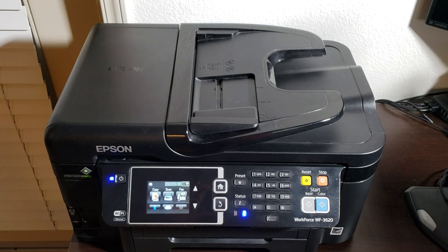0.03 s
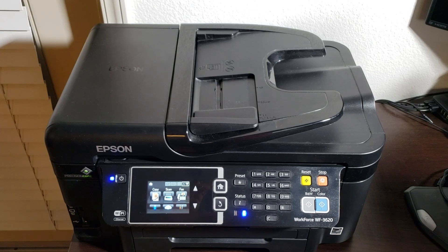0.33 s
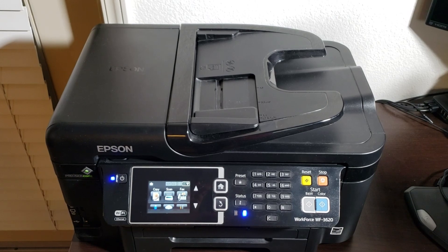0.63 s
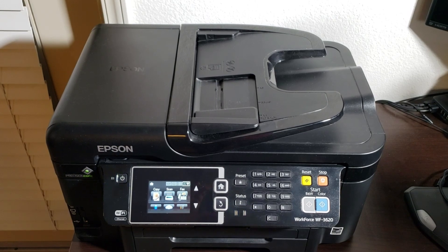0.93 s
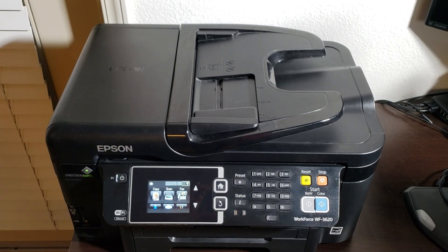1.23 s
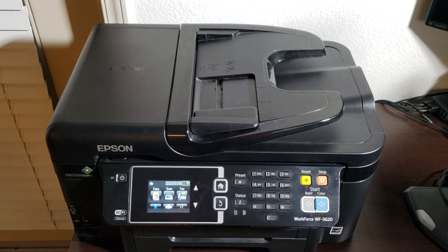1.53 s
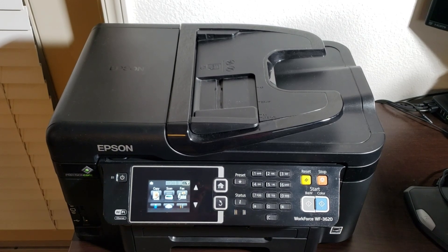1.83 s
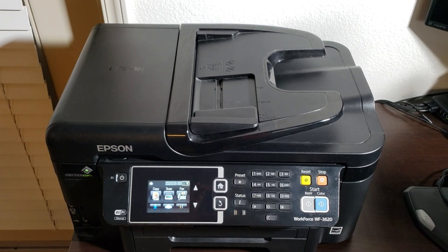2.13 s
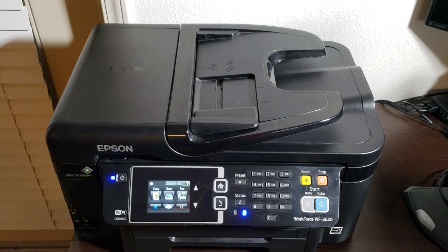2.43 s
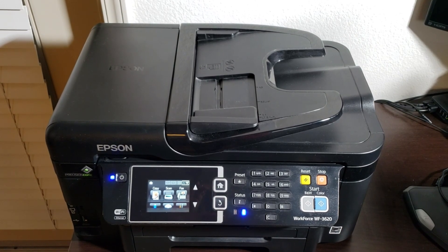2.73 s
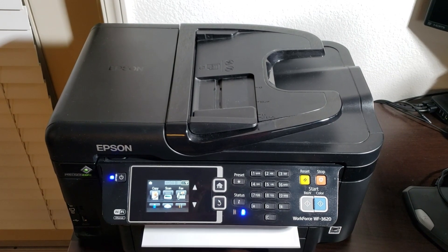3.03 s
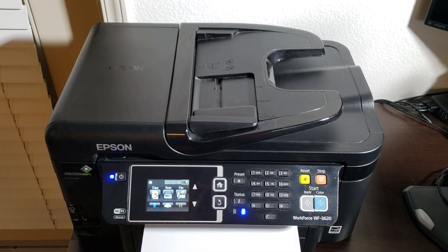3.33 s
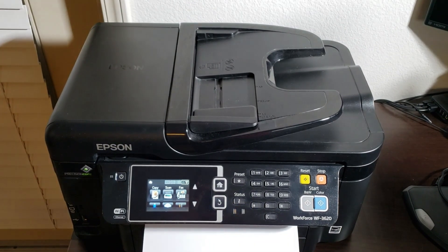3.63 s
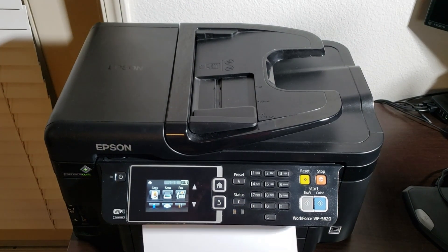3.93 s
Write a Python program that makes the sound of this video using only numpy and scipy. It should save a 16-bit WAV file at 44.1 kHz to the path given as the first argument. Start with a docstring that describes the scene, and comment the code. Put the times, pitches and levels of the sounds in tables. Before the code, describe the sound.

Three rattling printer clunks, followed by a whirring feed motor and the hiss of sliding paper.

```python
"""On a desk in a small quiet room, an inkjet printer works close by, over a low hum.
Three times its carriage rumbles, clashes against a latch and knocks into its stop, ringing the frame.
Its drive clacks in the hollow plastic housing as it starts and stops.
Then the geared feed motor whirs in two runs and slides a sheet out. The paper hisses,
jerks the gears with a few knocks and squeals faintly on the rollers."""
import sys
import numpy as np
from scipy import signal
from scipy.fft import rfft, irfft
from scipy.io import wavfile

SR = 44100
rng = np.random.default_rng(int(sys.argv[2]) if len(sys.argv) > 2 else 0)


def log_audio(samples):
    """Write samples as a 16-bit WAV file to the path given in sys.argv[1]."""
    # one column per channel
    frames = np.atleast_2d(samples).T
    # limit to full scale, then quantise
    limited = np.clip(frames, -1, 1)
    pcm = np.round(limited * 32767).astype(np.int16)
    wavfile.write(sys.argv[1], SR, pcm)


N = 176400
T = np.arange(N) / SR  # time of each sample, in seconds
FREQ = np.arange(4097) * SR / 8192  # frequencies the filters work on, in Hz

# how long the room takes to die away by 60 dB (f/Hz, t/s)
ROOM_DECAY = [(100, 0.63), (7000, 0.53), (10000, 0.42), (16000, 0.49)]
# what differs between the ears, against what they share (f/Hz, level/dB)
STEREO_WIDTH = [(150, -21.5), (400, -9.5), (1300, 1.5), (4000, 0)]
# how much louder the left ear is than the right (f/Hz, level/dB)
LEFT_LEAD = [(60, 3), (1300, 2.5), (2400, -0.5), (4400, 9.5), (8000, 6), (12000, 1.5)]
# tones of the resting printer and of the powered motor (f/Hz, level/dB)
IDLE_TONES = [(59.2, -72.5), (120, -68), (266, -73)]
MOTOR_TONES = [(59.2, -67), (119, -63)]
# tone colours: how strong the lows and highs of a sound are against each other (f/Hz, level/dB)
AIR_COLOUR = [(25, -18.5), (60, -5.5), (250, -3.5), (450, -1.5), (600, -10.5), (1200, -19.5), (1480, -10),
              (1850, -28), (9000, -41.5), (14000, -30.5)]
PAPER_COLOUR = [(800, 6), (4500, -1.5), (7000, -7), (11500, -3), (16000, -8)]
GEAR_COLOUR = [(50, -37), (130, -14), (220, 7), (310, -1), (410, -1.5), (490, 4.5), (720, 2), (1050, 1.5),
               (1450, -3), (1900, -2), (2500, -7.5), (5000, -16.5), (8000, -23), (16000, -47)]
RUMBLE_COLOUR = [(30, -34.5), (90, -13.5), (165, -7), (215, 5), (370, -14), (1000, -10), (5000, -27.5),
                 (16000, -49.5)]
LATCH_COLOUR = [(200, -46.5), (900, 7), (2300, -1), (3350, 10), (5200, -3.5), (6700, 3), (9500, -5.5),
                (12000, 0), (16000, -12.5)]
CRACK_COLOUR = [(500, -20), (1500, 4.5), (4000, -1), (10000, -10.5)]
CLACK_COLOUR = [(150, -17.5), (560, -17), (700, 5.5), (920, 2.5), (1540, 1.5), (2100, -8.5), (3700, -14.5),
                (16000, -59.5)]
# hiss of the sliding sheet (t/s, level/dB)
PAPER_HISS = [(2.26, -73), (2.29, -54.5), (2.385, -59.5), (2.40, -48.5), (3.14, -50), (3.165, -61),
              (3.27, -67.5), (3.319, -47.5), (3.65, -49), (3.72, -58.5), (4.0, -51.5)]
# squeal of the sheet on the exit rollers (t/s, f/Hz, level/dB)
PAPER_SQUEAL = [(3.445, 4460, -62), (3.53, 4490, -60.5), (3.57, 4540, -55), (3.61, 4590, -61),
                (3.68, 4590, -66)]
# runs of the feed motor (start t/s, fade t/s, stop t/s, rattle level/dB, rattle fade rate/(dB/s))
FEED_RUNS = [(2.246, 3.115, 3.14, -45, 160), (3.269, 3.637, 3.99, -45, 48)]
# whine of gears and motor (f/Hz, first run level/dB, second run level/dB)
WHINE_TONES = [(241, -51.5, -58), (489, -58.5, -57.5), (720, -61, -65), (909.5, -58, -55), (1080, -59, -60),
               (1820, -63, -57.5), (2725, -70, -66)]
# blows in the feed gears and the carriage drive (t/s, level/dB, chatter t/s, relative crack level/dB)
GEAR_KNOCKS = [(2.517, -5, 0.0071, -3), (3.3835, -14, 0.0043, -18), (3.389, -7, 0.018, -24),
               (3.9045, -18.5, 0.0083, -1), (3.9495, -12.5, 0.01, -3.5)]
DRIVE_CLACKS = [(.0205, -6.5, 0.0043, -16), (.8245, -14, 0.011, -28), (.8395, -13.5, .0069, -27),
                (.9300, -11, .0045, 1), (.942, -16, 0.014, 6), (1.786, -12, 0.014, -25),
                (1.802, -15, 0.0054, -11), (1.8955, -5.5, 0.0041, -6), (2.040, -23, 0.009, -28)]
# ringing tones of the plastic housing (f/Hz, width f/Hz, level/dB)
HOUSING_TONES = [(734, 30, -6), (925, 50, -2.5), (1110, 25, -11.5), (1500, 140, -12.5)]
# ringing tones of frame and desk (f/Hz, level/dB, t/s to fall by 60 dB)
FRAME_TONES = [(76.1, -40.5, 0.57), (122.8, -43.5, 0.82), (204.8, -31, 0.2), (3230, -58.5, 0.41),
               (6400, -60, 0.55), (6700, -61, 0.45)]
# trips of the carriage (latch t/s, clash level/dB, stop t/s, rumble level/dB)
CARRIAGE_TRIPS = [(.001, -31.5, 0.018, -33.5), (0.909, -31.5, 0.92, -35.5), (1.875, -32.5, 1.89, -35)]


def amp(db):
    """Turn decibels into a factor to multiply by."""
    return 10 ** (np.asarray(db) / 20)


def unit(x):
    """Scale to an average power of 1."""
    return x / np.sqrt(np.mean(x ** 2))


def curve(points, f=FREQ):
    """Read between the rows of a table, giving each octave equal room."""
    hz, values = np.array(points).T
    return np.interp(np.log(f + 1), np.log(hz), values)


def shape(x, gain):
    """Turn each frequency up or down, without delay."""
    delay = len(FREQ) - 1
    response = np.roll(irfft(gain), delay, axis=-1)
    filtered = signal.oaconvolve(np.atleast_2d(x), np.atleast_2d(response), axes=-1)
    return filtered[:, delay:delay + x.shape[-1]]


def convolve(x, response):
    """Pass a sound through a filter or a room."""
    return signal.oaconvolve(np.atleast_2d(x), np.atleast_2d(response), axes=-1)[:, :N]


def colour(x, points):
    """Give a sound a tone colour; white noise keeps its power."""
    log_response = irfft(np.log(unit(amp(curve(points)))))
    half = len(log_response) // 2
    # fold it forward in time, so nothing rings before its cause
    log_response[1:half] *= 2
    log_response[half + 1:] = 0
    return convolve(x, irfft(np.exp(rfft(log_response))))


def drift(rate_hz, count=1000):
    """A smooth random wobble, about 1 in size."""
    hz = np.arange(count // 2 + 1) / T[-1]
    slow = irfft(rfft(rng.standard_normal(count)) * np.exp(-(hz / rate_hz) ** 2))
    return np.interp(T, np.linspace(0, T[-1], count), unit(slow))


def grains(spread):
    """A crowd of tiny contacts of uneven size."""
    return unit(rng.standard_normal(N) * np.exp(spread * rng.standard_normal(N)))


def fall(start, seconds):
    """Silence, then a jump to 1 that dies away."""
    return (T >= start) * fade(start, seconds)


def fade(start, seconds):
    """Stay at 1 until the start, then die away."""
    return np.exp(-np.maximum(T - start, 0) / seconds)


def wide_noise(count=N):
    """Noise that is alike in both ears in the bass and unrelated in the treble."""
    mid, side = rng.standard_normal((2, count))
    width = amp(curve(STEREO_WIDTH))
    total = np.hypot(1, width)
    return shape(mid, 1 / total) + np.array([[1], [-1]]) * shape(side, width / total)


def tone(hz, wander, rate_hz):
    """A tone whose pitch wavers by the share `wander`."""
    pitch = hz * (1 + wander * drift(rate_hz))
    return np.sqrt(2) * np.sin(2 * np.pi * np.cumsum(pitch) / SR)


def room(echo_db=0, near_s=0.007, near_db=3.5, tail_db=1, count=30000):
    """A click in the room: direct sound, quick echoes from desk and wall, then a fading tail."""
    t = T[:count]
    near = wide_noise(count) * np.exp(-t / near_s) * amp(near_db) / np.sqrt(near_s * SR / 2)
    noise, tail = wide_noise(count), 0
    for hz, decay_s in ROOM_DECAY:
        band = shape(noise, curve([(f, float(f == hz)) for f, _ in ROOM_DECAY]))
        tail = tail + band * amp(-60 * t / decay_s) * (t > near_s)
    response = amp(echo_db) * (near + amp(tail_db) * unit(tail) / np.sqrt(count))
    response[:, 0] += 1  # the direct sound
    return unit(response) / np.sqrt(count)


def hum_and_air(waver_db=3.5, air_db=-63.5, swell_db=2.36):
    """The printer hums softly over the gently swelling noise of the room's air."""
    hum = sum(amp(db + waver_db * drift(3.1)) * tone(hz, 0.025, 14.5) for hz, db in IDLE_TONES)
    air = amp(air_db - swell_db * drift(8.3)) * colour(wide_noise(), AIR_COLOUR)
    return hum + air


def paper(rasp=0.02):
    """The sheet hisses over rollers and guides, with a rising, raspy squeal as it comes out."""
    times, db = np.array(PAPER_HISS).T
    sliding = wide_noise() * amp(np.interp(T, times, db, left=-120) + 1.6 * drift(100))
    hiss = colour(sliding, PAPER_COLOUR)
    times, hz, db = np.array(PAPER_SQUEAL).T
    loudness = amp(np.interp(T, times, db) + 2 * drift(50)) * (T > times[0]) * (T < times[-1])
    squeal = loudness * tone(np.interp(T, times, hz), rasp, 140)
    return hiss + convolve(squeal, room())


def motor_thump(hz=206, db=-39.5, decay_s=0.014):
    """The feed motor thumps softly as it starts its last run."""
    start = FEED_RUNS[-1][0]
    swell = 2 * (fall(start, decay_s) - fall(start, decay_s / 3))
    return amp(db) * swell * np.sin(2 * np.pi * hz * (T - start))


def feed_motor(spin_up_s=0.066, tooth_hz=121.5, wander_hz=2.8, lurch_db=1.7, gears=4):
    """Several gears rattle, each from its own place, while the motor whines and hums."""
    drive, whine = np.zeros(N), np.zeros((2, N))
    for run, (start, fade_at, stop, db, fade_rate) in enumerate(FEED_RUNS):
        spin_up = (T > start) * (1 - 0.45 * fall(start, spin_up_s))
        strength = spin_up * amp(-fade_rate * np.maximum(T - fade_at, 0)) * fade(stop, 0.053)
        drive += amp(db) * strength
        for hz, *run_db in WHINE_TONES:
            flutter_db = np.array([drift(17), drift(29)])  # left ear, right ear
            whine += amp(run_db[run] + flutter_db) * strength ** 2 * tone(hz, wander_hz / hz, 37.2)
    teeth = 1 + 0.26 * tone(tooth_hz, 0.0303, 13.3)  # the rattle pulses as gear teeth meet
    drive *= teeth / np.sqrt(gears)
    rattle = sum(convolve(drive * amp(lurch_db * drift(40)) * grains(0.53), room())
                 for _ in range(gears))
    powered = np.clip((T - FEED_RUNS[0][0]) / spin_up_s, 0, 1)
    hum = powered * sum(amp(db) * tone(hz, 0.0169, 3.26) for hz, db in MOTOR_TONES)
    return colour(rattle, GEAR_COLOUR) + whine + hum


def strike(table, blow_db=9, soften_s=0.006):
    """Force and crack of blows that shake loose parts; the longer the chatter, the softer the blow."""
    force, crack = np.zeros((2, N))
    for start, db, chatter_s, crack_db in table:
        swell = fall(start, chatter_s) - fall(start, chatter_s / 10)
        chatter = grains(0.57) * swell / np.sqrt(chatter_s * SR / 2)
        force += amp(db) * chatter
        force[int(start * SR)] += amp(db + blow_db) * np.exp(-chatter_s / soften_s)
        crack += amp(db + crack_db) * chatter
    return force, colour(crack, CRACK_COLOUR)


def gear_knocks():
    """The sheet's edges jerk the rollers and knock all the gears."""
    force, crack = strike(GEAR_KNOCKS)
    return colour(force, GEAR_COLOUR) + crack


def frame_ring(pitch_spread=0.0026, build_s=0.0078):
    """Each time the carriage hits its stop, the desk booms and the metal frame rings."""
    ring = np.zeros((2, N))
    for _, _, stop, _ in CARRIAGE_TRIPS:
        first = int(stop * SR)
        t = T[:min(SR, N - first)]
        for hz, db, decay_s in FRAME_TONES:
            detune, turn, lag = rng.standard_normal(3)
            phase = 2 * np.pi * (hz * (1 + pitch_spread * detune) * t + turn)
            ear_shift = np.array([[1], [-1]]) * lag * amp(curve(STEREO_WIDTH, hz))
            loudness = amp(db - 60 * t / decay_s) * (1 - np.exp(-t / build_s))
            ring[:, first:first + len(t)] += loudness * np.sin(phase + ear_shift)
    return ring


def carriage(travel_s=0.106, rise_s=0.0013, hold_s=0.0052):
    """The carriage rumbles louder as it nears the stop, and the latch clashes just before."""
    rumble, clash = np.zeros((2, N))
    for latch, clash_db, stop, rumble_db in CARRIAGE_TRIPS:
        progress = np.clip(1 - (stop - T) / travel_s, 0, 1)
        rumble += amp(rumble_db) * progress ** 0.67 * fade(stop, 0.019)
        rise = np.clip((T - latch) / rise_s, 0, 1)
        clash += amp(clash_db) * rise * fade(latch + rise_s + hold_s, 0.0061)
    return colour(rumble * grains(0.66), RUMBLE_COLOUR) + colour(clash * grains(0.6), LATCH_COLOUR)


def housing(x):
    """Add the hollow ring of the plastic housing to a sound."""
    ring = sum(amp(db) / (1 + 1j * (FREQ ** 2 - hz ** 2) / (width * (FREQ + 1)))
               for hz, width, db in HOUSING_TONES)
    return x + convolve(x, irfft(ring))


def drive_clacks():
    """The carriage drive clacks as it starts and stops, ringing the housing."""
    force, crack = strike(DRIVE_CLACKS)
    return housing(colour(force, CLACK_COLOUR)) + crack


def scene():
    """The printer stands a little to the left, in its room."""
    blows = convolve(drive_clacks() + gear_knocks(), room(echo_db=-1))
    trips = convolve(carriage(), room()) + frame_ring()
    sound = blows + trips + feed_motor() + motor_thump() + paper() + hum_and_air()
    ear_db = np.array([[1], [-1]]) * curve(LEFT_LEAD) / 2
    return shape(sound, amp(ear_db))


def record(dry):
    """Cut away the very highest treble."""
    top_hz = 15850
    return signal.sosfilt(signal.ellip(10, .2, 70, top_hz, fs=SR, output="sos"), dry)


dry = scene()
out = record(dry)
log_audio(out)
```